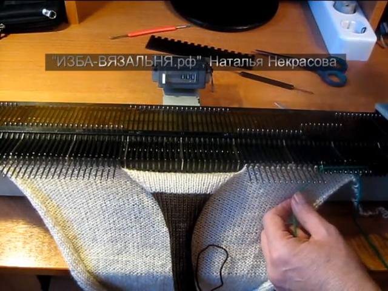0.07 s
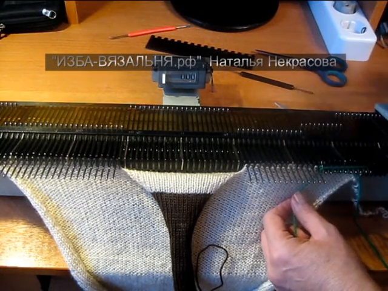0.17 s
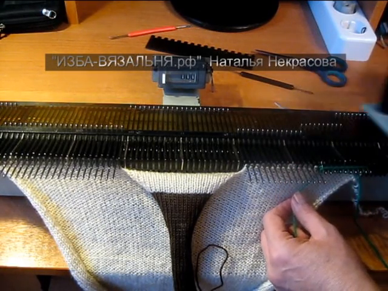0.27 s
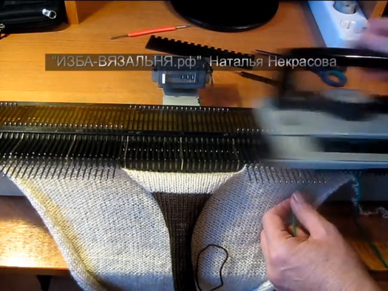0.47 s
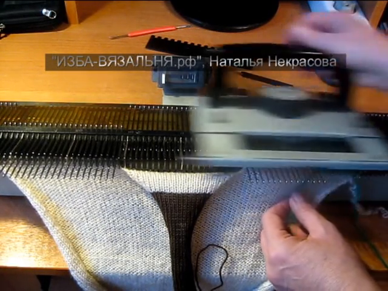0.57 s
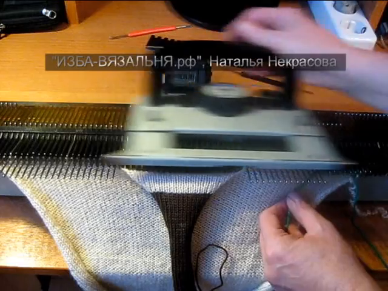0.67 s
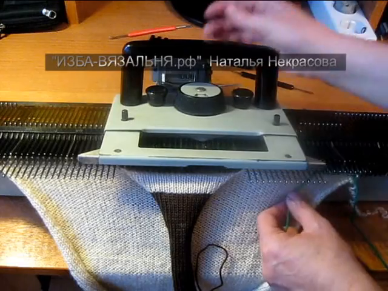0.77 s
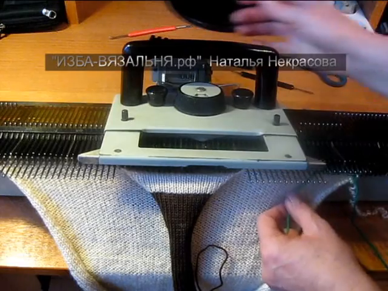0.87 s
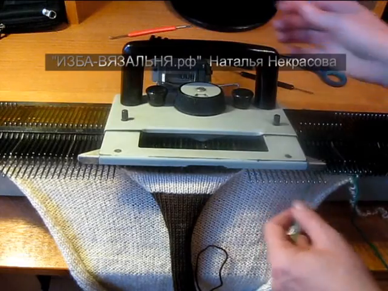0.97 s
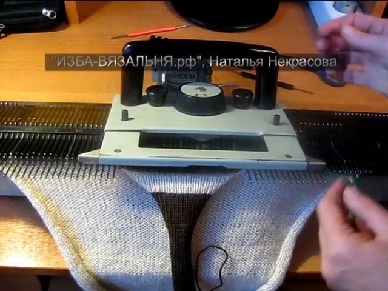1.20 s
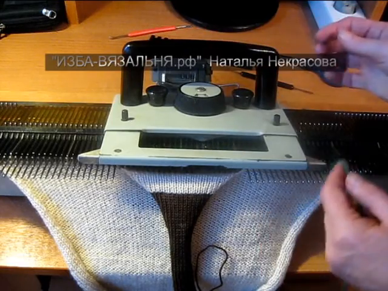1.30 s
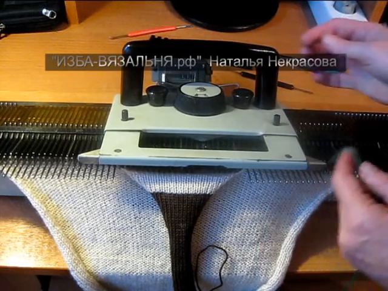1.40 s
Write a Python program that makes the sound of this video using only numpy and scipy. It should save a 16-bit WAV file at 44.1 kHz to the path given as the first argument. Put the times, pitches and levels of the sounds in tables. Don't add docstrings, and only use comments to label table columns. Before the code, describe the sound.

After a faint tool rattle over low hum and hiss, a knitting carriage slides harshly along its needle bed, needles ticking in a quickening train, stops, then soft knocks and a brief metal scrape, heard from above.

```python
import sys
import numpy as np
from scipy import signal
from scipy.fft import rfft, irfft, next_fast_len
from scipy.io import wavfile
from scipy.ndimage import uniform_filter1d, map_coordinates

SR = 44100
rng = np.random.default_rng(int(sys.argv[2]) if len(sys.argv) > 2 else 0)


def generate_wav(sig):
    pcm = np.round(np.clip(np.atleast_2d(sig).T, -1, 1) * 32767).astype(np.int16)
    wavfile.write(sys.argv[1], SR, pcm)


def boost(x):
    u = np.asarray(x, float) / 20
    return 10 ** u


N = 63945
TIME = np.arange(N) / SR


def unit(x):
    return x / np.sqrt(np.mean(x ** 2) + 1e-20)


def along(points, hz):
    f, v = np.transpose(points)
    return np.interp(np.log(hz + 1), np.log(f + 1), v)


def curves(rows):
    s, *columns = np.transpose(rows)
    return [np.interp(TIME, s, column) for column in columns]


def wobble(rate):
    knots = rng.standard_normal(int(N * rate / SR) + 4)
    return map_coordinates(knots, [TIME * rate])


def filtered(x, response):
    m = next_fast_len(N + SR // 2)
    return irfft(rfft(x, m) * response(np.fft.rfftfreq(m, 1 / SR)), m)[..., :N]


def resonant(x, peaks):
    def response(f):
        total = 0
        for k, (centre, width, db) in enumerate(peaks):
            damping = 1j * f * width
            total = total + (-1) ** k * boost(db) * damping / (centre * centre - f * f + damping)
        return total
    return filtered(x, response)


def bursts(times, gains, t60):
    energy = np.bincount(np.round(times * SR).astype(int), gains ** 2, N)[:N]
    power = signal.lfilter([1], [1, -boost(-120 / (t60 * SR))], energy)
    return np.sqrt(np.abs(power)) * rng.standard_normal(N)


def ring(s, db, hz, t60):
    t = np.clip(TIME - s, 0, None)
    onset = 1 - np.exp(-t * hz)
    return boost(db - 60 * t / t60) * np.sin(2 * np.pi * hz * t) * onset


# (frequency [Hz], level [dB])
NEEDLE_COLOUR = [(600, -35.5), (1500, 3.5), (3000, 3), (6000, 1.5), (9200, 0.5), (13000, 0), (15500, -6)]


def steel(x):
    peak_db = max(db for _, db in NEEDLE_COLOUR)
    return filtered(x, lambda hz: boost(along([(250, -77)] + NEEDLE_COLOUR, hz) - peak_db))


# (frequency [Hz], level per Hz [dB])
FLOOR_SPECTRUM = [(15, -27), (25, -8), (126, -4), (169, -5), (313, -4), (523, -7), (895, -10), (1140, -10),
                  (15500, -26.5)]


def floor():
    level_db, duck_db, duck_s = -54.5, -6, .05
    loud = 1. * ((TIME > .35) & (TIME < .62))
    loud = uniform_filter1d(loud, int(duck_s * SR))
    hiss = unit(filtered(rng.standard_normal(N), lambda hz: boost(along(FLOOR_SPECTRUM, hz))))
    return boost(level_db + duck_db * loud + 0.27 * wobble(10.7)) * hiss


# (frequency [Hz], t60 [s])
ROOM_DECAY = [(300, 0.3), (2000, 0.4), (10000, 0.31)]


def room(x):
    delay = 200
    hz, t, z = signal.stft(rng.standard_normal(SR // 2), SR, nperseg=256)
    decay = boost(-60 * t / along(ROOM_DECAY, hz)[:, None])
    tail = signal.istft(z * decay, SR, nperseg=256)[1]
    return signal.fftconvolve(np.pad(x, (delay, 0)), tail / np.linalg.norm(tail))[:N]


# (start [s], end [s], frequency [Hz], level [dB])
TABLE_MODES = [
    (0.492, 0.67, 293, -51.5),
    (0.58, 0.77, 135, -59),
    (.78, 0.912, 128, -50),
    (.73, .8, 630, -43),
    (0.26, .37, 770, -30.5),
    (.73, .78, 295, -51.5),
]


def drones():
    total = 0
    for start, end, hz, db in TABLE_MODES:
        progress = np.clip((TIME - start) / (end - start), 0, 1)
        swell = np.sqrt(np.abs(np.sin(np.pi * progress)))
        tone = np.sin(2 * np.pi * hz * TIME + 0.96 * wobble(44.4))
        total = total + boost(db + 2.4 * wobble(26.3)) * swell * tone
    return total


# (time [s], peak level [dB], frequency [Hz], t60 [s], tick relative to peak [dB])
HAND_KNOCKS = [
    (.0005, -42, 170, .1, 12),
    (.255, -41, 105, .14, -40),
    (.315, -41, 60, .08, -40),
    (.9705, -31.5, 530, .04, -17),
    (1.152, -40, 110, .045, -40),
    (1.236, -60, 400, .02, 14),
    (1.424, -38, 75, .05, -40),
]


def knocks():
    s, db, _, _, tick_db = np.transpose(HAND_KNOCKS)
    taps = steel(bursts(s, boost(db + tick_db), .025))
    for start, peak_db, hz, t60, _ in HAND_KNOCKS:
        taps = taps + ring(start, peak_db, hz, t60) + .9 * ring(start, peak_db, 1.35 * hz, t60)
    return taps


def creak():
    burst = bursts(np.array([.187]), boost(np.array([-51])), .2)
    return filtered(burst, lambda hz: hz > 9500)


def settle():
    return resonant(bursts(np.zeros(1), boost(np.array([-38])), 0.12), [(900, 300, 11)])


# (time [s], level [dB])
SCRAPE_LEVEL = [
    (1.38, -67),
    (1.40, -56.5),
    (1.428, -52.5),
    (1.436, -46),
    (1.45, -50),
]
# (frequency [Hz], width [Hz], level [dB])
SCRAPE_MODES = [(2740, 110, 8), (3040, 150, 8.5), (3520, 380, 7), (4350, 1000, -2.5), (6000, 900, -8.5),
                (12000, 5000, -15)]


def scrape():
    level_db, = curves([(1.3, -100)] + SCRAPE_LEVEL)
    metal = unit(resonant(rng.standard_normal(N), SCRAPE_MODES))
    return boost(level_db + 1.3 * wobble(150)) * metal


def lurch():
    start_s, rise_s, fall_s, level_db = 0.222, 0.0029, 0.0044, -36
    t = TIME - start_s
    shape = np.exp(-np.where(t < 0, -t / rise_s, t / fall_s))
    scuff = resonant(rng.standard_normal(N), [(3000, 2800, 0)])
    scuff = resonant(scuff, [(2500, 4000, 0)])
    return boost(level_db) * shape * unit(scuff)


# (time [s], level [dB])
SHOVES = [
    (.2225, 0),
    (.243, 2),
    (.284, -1),
    (.304, 2),
]
# (frequency [Hz], level [dB], t60 [s])
PLATE_MODES = [(291, -36, 0.053), (475.7, -38.5, 0.17), (814, -29.5, 0.064), (1620, -28, 0.056),
               (2530, -30.5, .04)]


def bed_plate():
    return sum(ring(s, db + level, hz, t60) for s, db in SHOVES for hz, level, t60 in PLATE_MODES)


CATCH_TIMES = [.223, .242, .2448, .252, .2572, .282, .2842, .2922, .3035, .3094, .3188, .3236, .3322, .337,
               .3445, .3487]
# (tick level [dB], ring level [dB], ring frequency [Hz])
CAUGHT_NEEDLES = [(-70, -32, 1500), (-13.5, -20.5, 3200), (-16.5, -21, 820), (-14, -13.5, 4320),
                  (-10, -19.5, 4400), (-26, -32, 2400), (-8, -19, 1400), (-11, -18.5, 1900),
                  (-25, -20.5, 660), (-9, -16, 5700), (-12, -22, 3300), (-8.5, -16.5, 3300),
                  (-12.5, -23, 2100), (-13, -18, 3250), (-29, -23.5, 1270), (-14, -29, 3900)]


def catches():
    ring_t60, pair_ratio = .026, 1.08
    ticks = bursts(np.array(CATCH_TIMES), boost(np.transpose(CAUGHT_NEEDLES)[0]), .013)
    notes = 0
    for s, (_, db, hz) in zip(CATCH_TIMES, CAUGHT_NEEDLES):
        notes = notes + ring(s, db, hz, ring_t60) + ring(s, db - 3, pair_ratio * hz, ring_t60)
    return steel(ticks) + notes


# (frequency [Hz], width [Hz], level [dB])
SHELL_NEAR = [(783, 143, 7), (1580, 250, 0.5), (3100, 570, -2), (4300, 700, -16), (6060, 900, -7)]
# (frequency [Hz], width [Hz], level [dB])
SHELL_PAST = [(654, 264, -6), (1315, 280, 3), (2090, 640, 2), (2795, 710, 5), (5200, 3900, -1.5)]


def body(x, past):
    past = np.clip(past, 0, 1)
    low_hz = 550
    x = filtered(x, lambda f: (1j * f / (low_hz + 1j * f)) ** 2)
    return np.sqrt(1 - past) * resonant(x, SHELL_NEAR) + np.sqrt(past) * resonant(x, SHELL_PAST)


def latch_clatter(past):
    per_second, t60, spread_db, body_db = 2200, .005, 2.6, -16
    draw = rng.random((4000, 2))[:int(per_second * N / SR)]
    flips = bursts(draw[:, 0] * TIME[-1], boost(-spread_db * np.log(1 - draw[:, 1])), t60)
    flips = steel(flips)
    return latch_mix(flips, past, body_db)


def latch_mix(flips, past, body_db):
    return unit(flips) + boost(body_db) * unit(body(flips, past))


def rail_rasp(past):
    top_hz, hiss_db = 5640, -17.5
    rub = rng.standard_normal(N) * boost(1.47 * wobble(39.6) + 0.96 * wobble(200))
    shell = filtered(body(rub, past), lambda f: 1 / (1 + (f / top_hz) ** 6))
    return unit(shell) + boost(hiss_db) * unit(steel(rub))


# (time [s], needle number)
CAM_TRAVEL = [
    (.3585, 0),
    (.4107, 6),
    (.448, 11),
    (.4944, 18),
    (.532, 24),
    (.6194, 36),
    (.714, 48),
    (.7317, 50),
    (.7707, 53),
]


def needle_train(past):
    jitter_s, scatter_db, body_db = .0003, 1.5, -8
    note_hz, sag_hz, note_db, fade_db = 3170, 18, -1.5, .14
    s, needle = np.transpose(CAM_TRAVEL)
    chance = rng.standard_normal((int(needle[-1]) + 1, 2))
    times = np.interp(np.arange(len(chance)), needle, s) - .0006 + jitter_s * chance[:, 0]
    level_db, = curves(BLOW_LEVEL)
    blows = boost(level_db) * bursts(times, boost(scatter_db * chance[:, 1]), .013)
    notes = 0
    for k, (start, (c, d)) in enumerate(zip(times, chance)):
        hz = (note_hz - sag_hz * k) * (1 + 0.033 * d)
        notes = notes + ring(start, note_db - fade_db * k + 2 * c, hz, .019)
    return steel(blows) + boost(body_db) * body(blows, past) + boost(level_db) * notes


# (time [s], level [dB])
BLOW_LEVEL = [
    (.35, -13),
    (.43, -14),
    (.5, -17.5),
    (.58, -24),
    (.66, -19),
    (.73, -19),
    (.77, -26),
]
# (time [s], rasp level [dB], latch level [dB], carriage past the microphone [0-1])
PUSH_COURSE = [
    (.205, -82, -81.5, 0),
    (.236, -32.5, -72, 0.34),
    (.262, -27.5, -63, 0.18),
    (.31, -24, -30, 0.5),
    (.44, -30.5, -25, 0.76),
    (.56, -28.5, -26.5, 0.87),
    (.735, -29, -26.5, 0.8),
    (.78, -34.5, -44, 0.53),
    (.855, -36, -48.5, 0.74),
]


def carriage():
    rasp_db, latch_db, past = curves(PUSH_COURSE)
    stop_db = 225 * np.clip(TIME - PUSH_COURSE[-1][0], 0, None)
    latches = boost(latch_db - stop_db) * latch_clatter(past)
    rasp = boost(rasp_db - stop_db) * rail_rasp(past)
    return needle_train(past) + latches + rasp


def scene():
    hands = knocks() + creak() + settle() + scrape()
    near = drones() + hands + lurch() + bed_plate() + catches() + carriage()
    reverb_db = -10.5
    return (near + boost(reverb_db) * room(near) + floor())[None]


def top_cut(x):
    return signal.sosfilt(signal.butter(12, 16660, fs=SR, output="sos"), x)


def record(dry):
    gap_hz, gap_width_hz, shoulder_hz, share, top_hz = 7900, 220, 1050, 0.67, 15800

    def dip(hz, width):
        return 1 - np.exp(-((hz - gap_hz) / width) ** 2)

    def response(hz):
        notch = 0.013 + dip(hz, gap_width_hz)
        shoulders = 1 - share + share * dip(hz, shoulder_hz)
        return notch * shoulders * (hz < top_hz)

    mix = filtered(dry, response)
    return top_cut(mix)


dry = scene()
out = record(dry)
generate_wav(out)
```